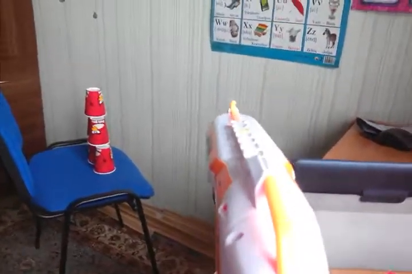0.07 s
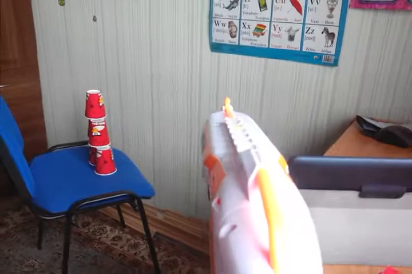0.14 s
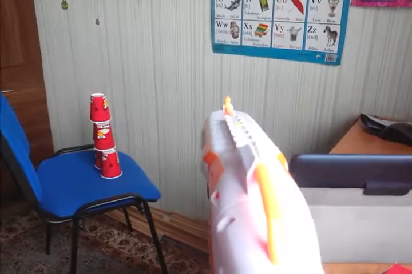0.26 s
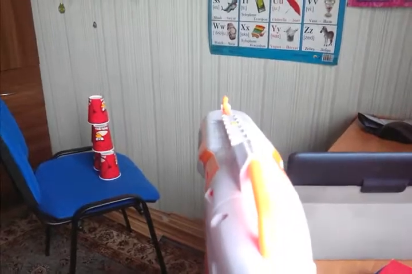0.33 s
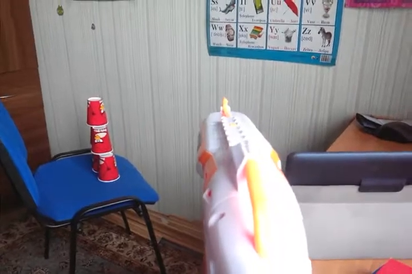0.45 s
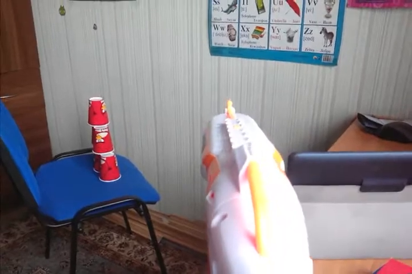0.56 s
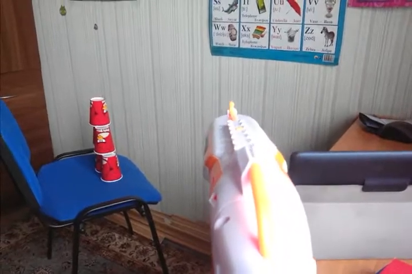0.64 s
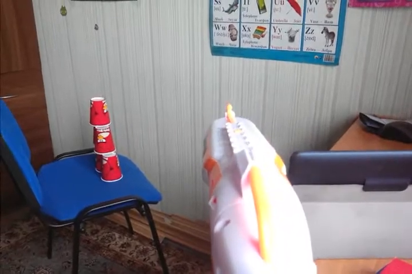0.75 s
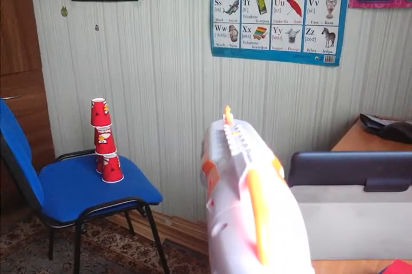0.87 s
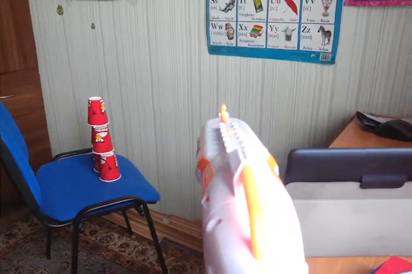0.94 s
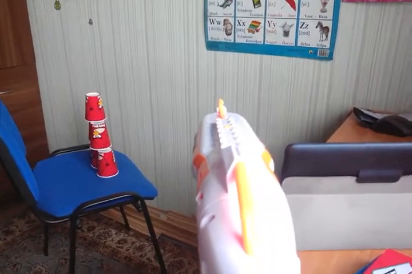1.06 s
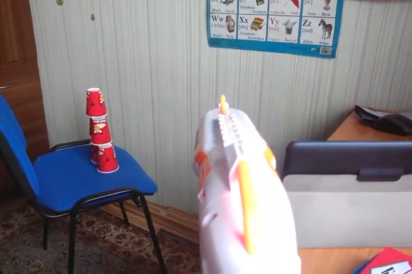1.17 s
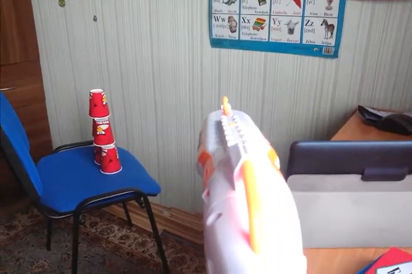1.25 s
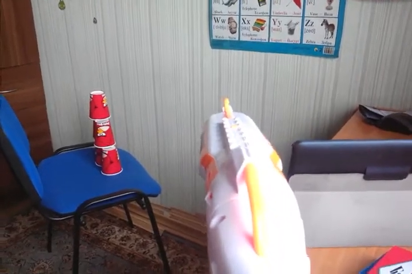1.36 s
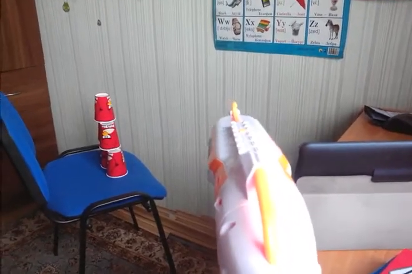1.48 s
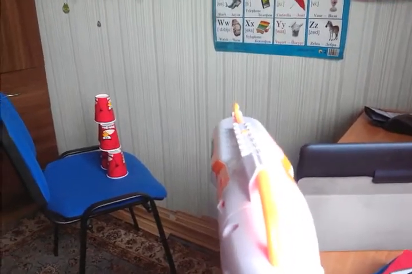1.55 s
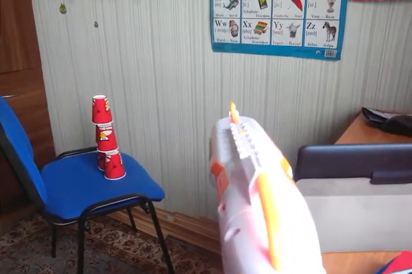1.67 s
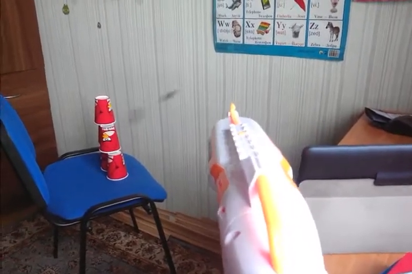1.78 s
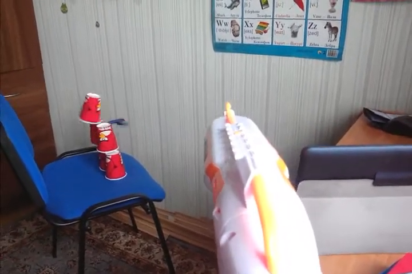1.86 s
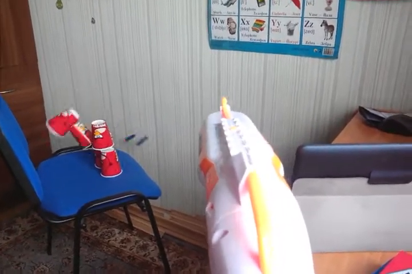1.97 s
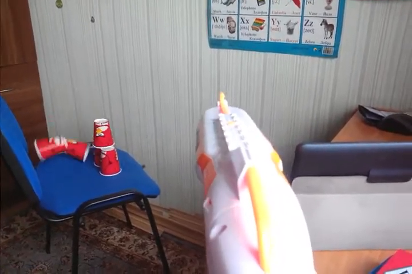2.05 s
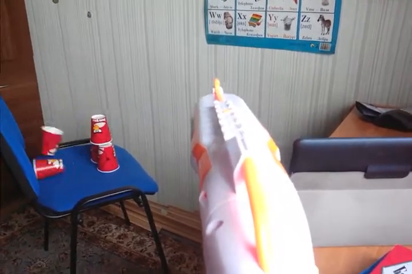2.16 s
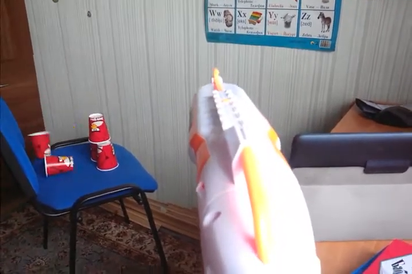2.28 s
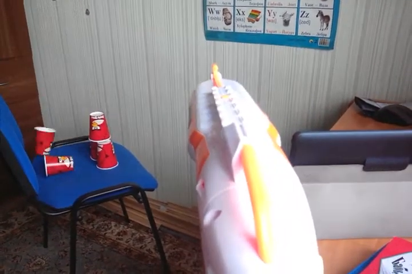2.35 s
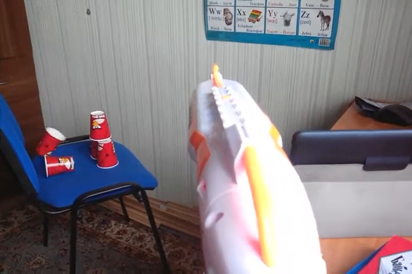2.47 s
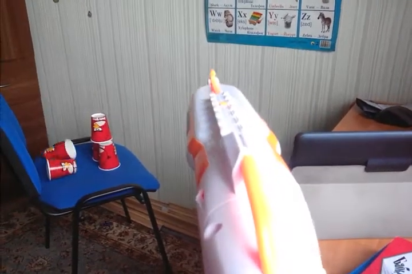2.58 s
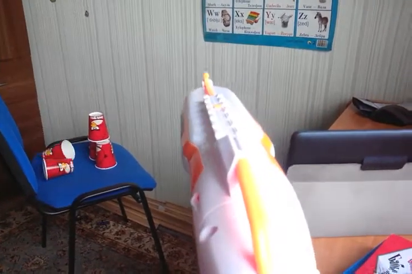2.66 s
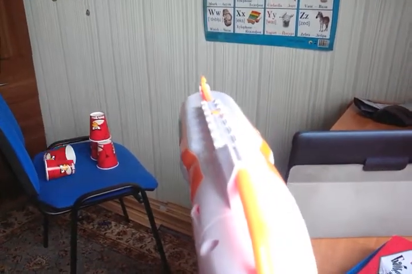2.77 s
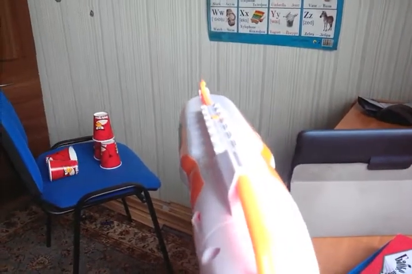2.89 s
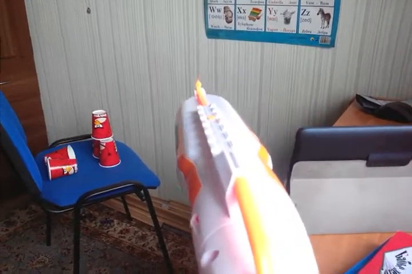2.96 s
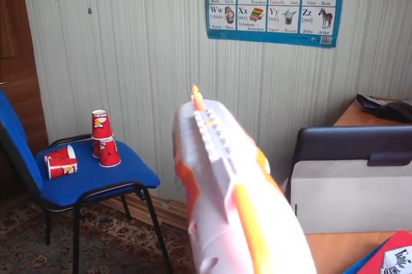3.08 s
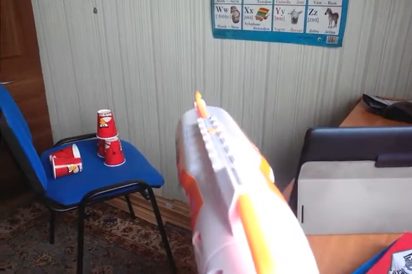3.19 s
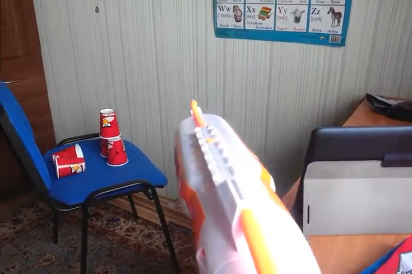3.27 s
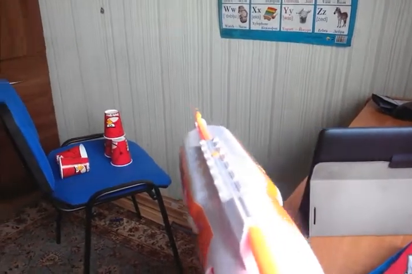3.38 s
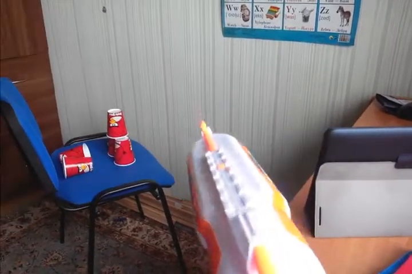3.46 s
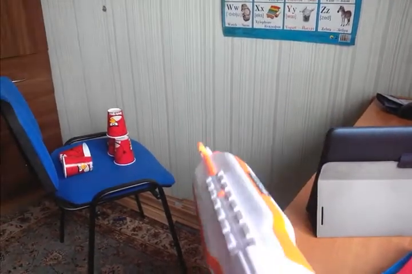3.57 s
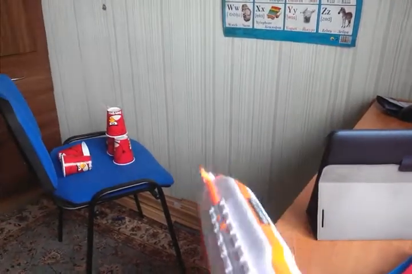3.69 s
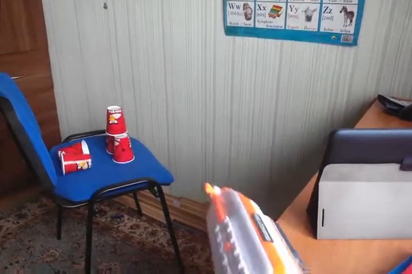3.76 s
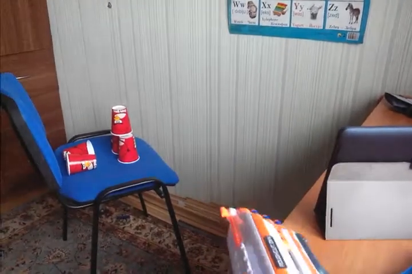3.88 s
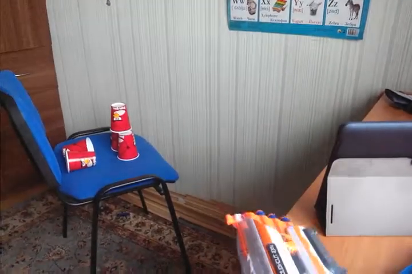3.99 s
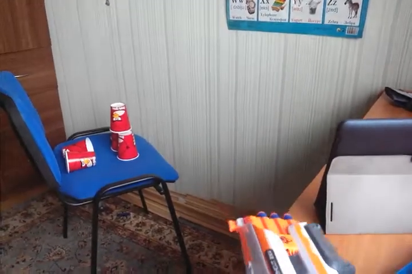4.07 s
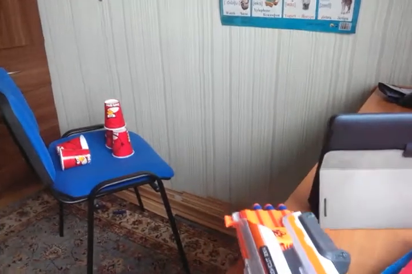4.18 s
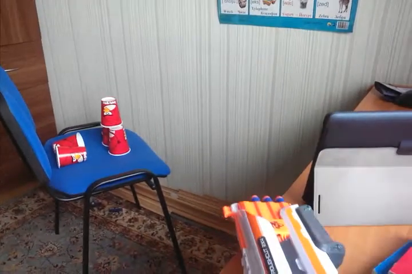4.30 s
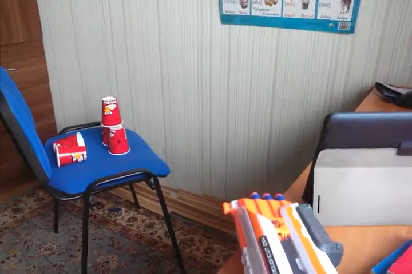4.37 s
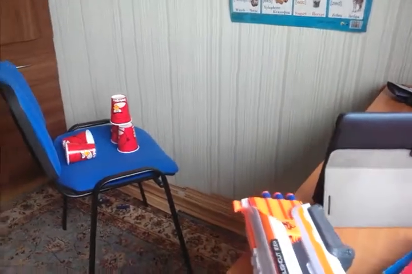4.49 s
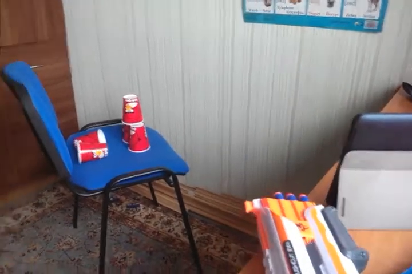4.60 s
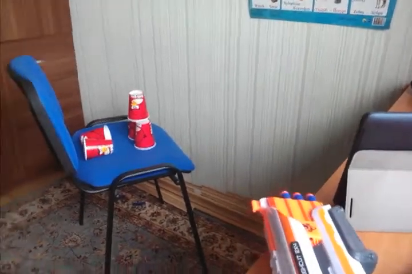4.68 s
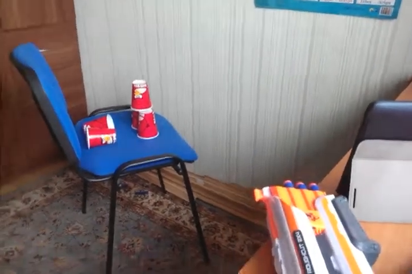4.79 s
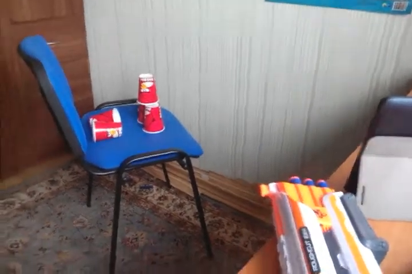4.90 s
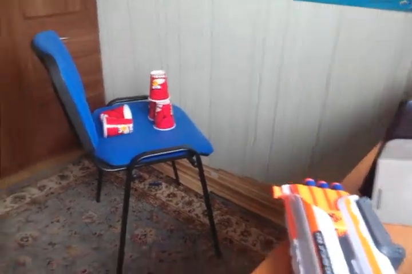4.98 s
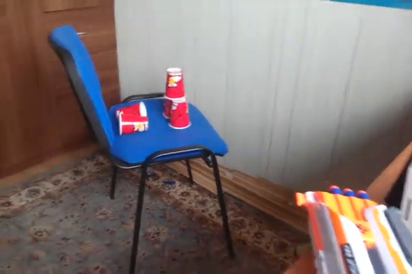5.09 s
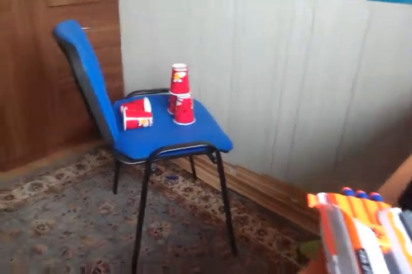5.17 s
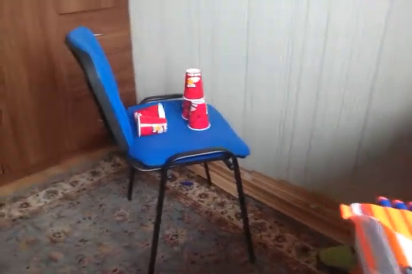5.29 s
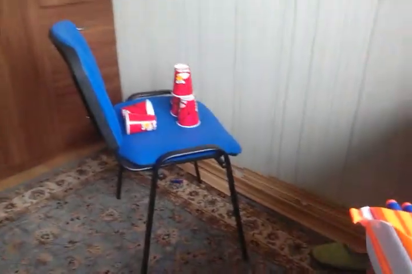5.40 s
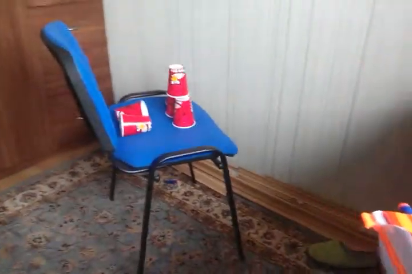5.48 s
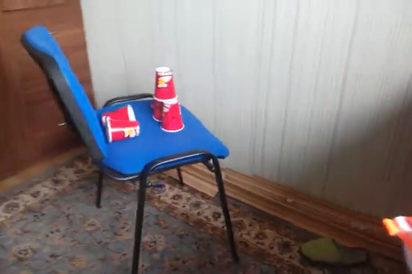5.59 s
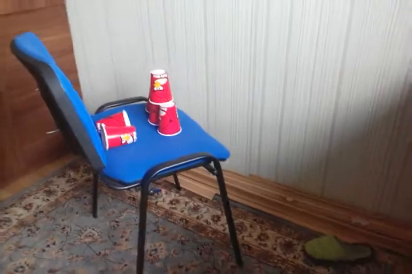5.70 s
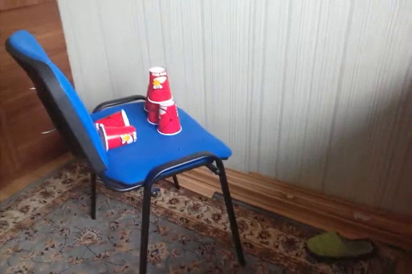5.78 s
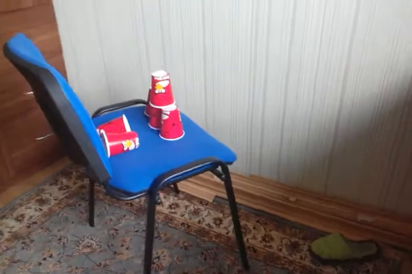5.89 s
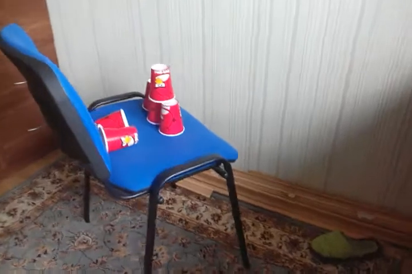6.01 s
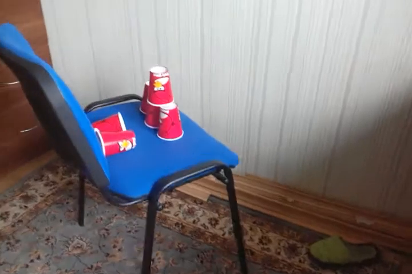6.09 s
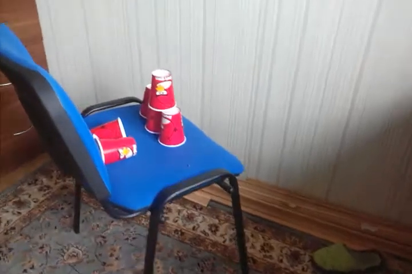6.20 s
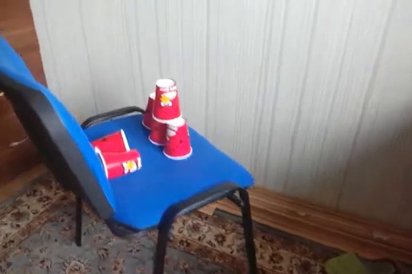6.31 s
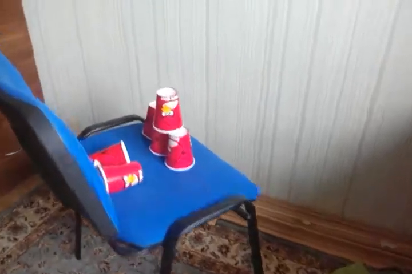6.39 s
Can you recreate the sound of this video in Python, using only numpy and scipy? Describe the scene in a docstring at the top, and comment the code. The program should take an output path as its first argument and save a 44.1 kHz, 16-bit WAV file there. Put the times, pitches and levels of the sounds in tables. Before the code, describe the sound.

Faint steady hiss for nearly two seconds, then a toy blaster fires very close: a hard, bright spring-plunger slam with plastic rattle. Foam darts tick off paper cups, which crack hollowly and drop onto a padded seat with a rim click and soft bumps. After a lull, the hollow plastic blaster knocks and clacks on a wooden desk, creaking slightly. Barely audible cloth rustle ends it. Small, lightly reverberant room, close small microphone.

```python
"""A spring toy blaster fires close by in a small room: catch, plunger slam and shell rattle, as filtered noise.
Its foam darts tick off paper cups, which crack, ring as damped modes and fall onto a padded chair.
A cup rocks against its neighbour; the blaster knocks and creaks on a wooden desk; sleeves rustle faintly.
Noise tails give the room; a soft hiss and a faint wavering whine lie under it all."""
import sys
import numpy as np
from scipy import signal
from scipy.fft import rfft, irfft, next_fast_len
from scipy.io import wavfile
from scipy.ndimage import map_coordinates

SR = 44100
rng = np.random.default_rng(int(sys.argv[2]) if len(sys.argv) > 2 else 0)


def to_wav(s):
    """Save 16-bit WAV."""
    ch = np.atleast_2d(s).T  # columns
    pcm = np.round(np.clip(ch, -1, 1) * 32767)  # PCM
    wavfile.write(sys.argv[1], SR, pcm.astype(np.int16))


N = 284291

# Trigger, catch, plunger slam, shell rattle: (time [s], level [dB], rattle t60 [s], treble tilt [dB/octave])
SHOT_EVENTS = [(1.764, -52, 0.027, -3), (1.8012, -19, 0.069, -1), (1.8117, -14.5, 0.11, 0.9),
               (1.8173, -19.5, 0.068, 3), (1.8294, -17, 0.027, -0.2), (1.8344, -22, 0.14, 1.5),
               (1.859, -27.5, 0.17, -5), (1.881, -29, 0.08, -2)]
# Darts glancing off cups and wall, then one dropping to the floor: (time [s], level [dB], resonance [Hz])
DART_TICKS = [(1.8597, -31, 4000), (1.8657, -29.5, 4100), (1.874, -31, 1180), (1.886, -29, 4200),
              (1.893, -28.5, 1180), (1.915, -35.5, 1170), (2.0947, -47, 2110), (2.0963, -44, 900)]
# Cups knocked: (time [s], wall level [dB], bottom level [dB], bottom pitch [Hz])
CUP_KNOCKS = [(1.938, -34.5, -36, 767), (1.9472, -24.5, -29.5, 763), (1.9655, -33.5, -34.5, 735),
              (1.973, -37, -25, 744), (2.015, -59, -38, 750), (2.2855, -51.5, -54, 780),
              (2.3636, -59.5, -69, 770), (2.402, -64, -58.5, 787), (2.530, -80, -64, 760),
              (2.716, -66, -67, 790), (2.802, -52.5, -59.5, 802), (2.807, -58.5, -50.5, 779)]
# A cup lands on its hard rim: (time [s], level [dB])
RIM_LANDINGS = [(2.1628, -34.5)]
# Cups land on the padded seat: (time [s], level [dB])
SEAT_LANDINGS = [(2.229, -46.5), (2.240, -42.5), (2.259, -57)]
# Blaster knocks on the desk:
# (time [s], clack level [dB], clack tilt [dB/octave], shell pitch [Hz], thud level [dB], hop [s])
DESK_KNOCKS = [(3.669, -59, 1, 1081, -83, 0.0065), (3.9949, -28.5, 2.3, 889, -46.5, 0.0045),
               (4.038, -40.5, 1, 957, -48.5, 0.002), (4.097, -54, -8, 740, -75, 0.015),
               (4.136, -44, -5.5, 753, -70, 0.013), (4.157, -48.5, 2.5, 802, -46, 0.0047),
               (4.2087, -35.5, 4, 1076, -26, 0.02), (4.283, -54.5, -7, 690, -46.5, 0.017),
               (4.357, -58, 1, 892, -74, 0.004), (4.539, -46.5, 2.5, 723, -57, 0.006),
               (4.595, -53, 0.5, 744, -52, 0.014), (4.7353, -46, 4, 1050, -69, 0.0043),
               (4.7473, -32.5, -3, 1430, -62, 0.003), (4.761, -39.5, -4.5, 1522, -46.5, 0.015),
               (4.795, -47.5, -8.5, 1650, -56, 0.012), (5.929, -57.5, -3.5, 905, -67, 0.017)]
# Blaster slides on the desk: (time [s], reference level [dB], t60 [s], hum level [dB])
DESK_SCRAPES = [(4.409, -57, 0.3, -61)]
# Dull thumps of chair, desk and floor: (time [s], level [dB], boom reference [Hz])
FURNITURE_THUMPS = [(1.955, -33.5, 406), (2.475, -70.5, 74.9), (2.70, -70, 49.95), (2.801, -74, 44),
                    (4.211, -44.5, 91), (4.804, -47.5, 90.9), (5.231, -66, 126), (5.73, -70, 118.2),
                    (5.901, -62, 129)]
# Sleeve movement: (time [s], level [dB])
SLEEVE_MOTION = [(4.85, -84), (5.0, -73.5), (5.14, -79.5), (5.22, -69), (5.6, -71), (5.71, -69), (5.9, -72),
                 (6.07, -78.5), (6.2, -74.5), (6.45, -75.5)]
# Quick slides of cloth: (middle [s], level [dB], 1/e time on each side [s])
SLEEVE_STROKES = [(4.998, -59.5, 0.032), (5.215, -62, 0.03), (5.295, -66.5, 0.015), (5.595, -63, 0.02),
                  (5.71, -64.5, 0.017), (6.44, -66.5, 0.065)]
# Hiss: (time [s], level [dB])
HISS_LEVEL = [(0, -66.3), (1.7, -66.4), (2.5, -67.3), (3.5, -67.7), (6.45, -67.7)]
# Whine before its slow level change: (mean frequency [Hz], level [dB])
WHINE_TONES = [(813, -83), (1624, -86.5), (2433, -94.5)]

# Relative spectra of blaster, paper, plastic, cushion, cloth, swish and hiss: (frequency [Hz], level [dB])
BLASTER_SPECTRUM = [(40, -40.5), (85, -33.5), (130, -11), (200, -3.5), (300, -8.5), (600, -2.5), (1300, -2),
                    (2150, 3), (3300, 1), (4300, -8), (5800, -12.5), (7500, -6.5), (11000, -17),
                    (14000, -27.5)]
PAPER_SPECTRUM = [(100, -20), (450, 0), (1000, 1), (1800, -7.5), (2500, -4), (3250, 3), (4100, -4.5),
                  (6000, -10), (9000, -13.5), (14000, -21.5)]
PLASTIC_SPECTRUM = [(60, -27), (200, -9), (700, -6.5), (1200, 3.5), (1900, -1.5), (2500, 1), (3400, -6.5),
                    (4600, -15), (7500, -19), (10000, -29), (14000, -42)]
CUSHION_SPECTRUM = [(25, -23), (55, -23), (130, 5.5), (300, 5), (600, -2.5), (1000, -5.5), (3000, -23),
                    (12000, -39)]
CLOTH_SPECTRUM = [(50, -10), (120, -8), (260, -1.5), (500, -0.5), (1000, -11), (3000, -18), (12000, -53)]
SWISH_SPECTRUM = [(200, -28.5), (1200, -3), (2200, 1), (2650, 3.5), (3300, -1), (4500, -5.5), (7000, -10.5),
                  (14000, -13)]
HISS_SPECTRUM = [(15, -61.5), (25, -27), (74, -14), (129, -3.5), (318, -3.5), (344, -4.5), (684, -7),
                 (824, -5), (1330, -9.5), (1600, -12), (1730, -11.5), (2440, -9), (2780, -12),
                 (8930, -15.5), (14000, -17)]
# A board radiates its slow motion poorly: (frequency [Hz], gain [dB])
BOARD_RADIATION = [(40, -25), (110, -16), (190, 2), (380, 6.5), (600, 9.5), (1500, 13)]

# Modes of cup bottom, wall and rim, shell and desk, before stretch: (frequency [Hz], relative level [dB], t60 [s])
BOTTOM_MODES = [(447, -17.5, 0.1), (753, 2.5, 0.051), (1109, -10.5, 0.041)]
WALL_MODES = [(3250, -1.5, 0.058), (3380, -3, 0.05)]
RIM_MODES = [(1070, 2, .03), (1220, 4.5, 0.089), (2495, 13, 0.015), (2560, 16, 0.025), (3740, 6, 0.035),
             (4000, 12, 0.013), (6970, 5.6, 0.026), (7940, 11, 0.012), (8860, 5, 0.021), (10250, -3, 0.012),
             (12400, -5, 0.012)]
SHELL_MODES = [(527, -1.5, 0.042), (919, 4.5, 0.038), (995, 0, 0.048), (1240, -6, 0.079),
               (2213, -7.5, 0.039), (3220, -19, 0.015)]
DESK_MODES = [(129.4, 1.5, 0.15), (204, 1, 0.069), (242.6, 4.5, 0.028), (320, -10.5, 0.12),
              (382, -3, 0.058), (432, -13.5, 0.089), (480, -12.5, 0.035)]
# Room decay: (frequency [Hz], t60 [s])
ROOM_T60 = [(100, 0.23), (300, 0.41), (1000, 0.4), (3000, 0.32), (7000, 0.27), (14000, 0.72)]

BLOW_SAMPLES = 16384
BLOW_TIME_S = np.arange(BLOW_SAMPLES) / SR
BLOW_HZ = np.fft.rfftfreq(BLOW_SAMPLES, 1 / SR)
TIME_S = np.arange(N) / SR
SLAM_S = SHOT_EVENTS[2][0]
ROCK_HZ = 786  # bottom pitch of the rocking cup


def blaster():
    """The catch lets go, the plunger slams home, the shell rattles; air puffs out and the room booms."""
    wet_db = -9
    puff = boom(db=-28.5, ref_hz=202, t60_s=0.1)
    puff = puff + boom(db=-45.5, ref_hz=134.6, t60_s=0.42)
    puff = puff + boom(db=-56, ref_hz=28, t60_s=0.3)
    hits = [(SLAM_S, puff, wet_db)]
    for s, db, t60_s, tilt_db in SHOT_EVENTS:
        rattle = crack(BLASTER_SPECTRUM, t60_s, tilt_db, snap=0.15)
        hits.append((s, sized(rattle, db), wet_db))
    return hits


def spring():
    """The released spring sings on faintly: one slowly decaying sine."""
    since_s = np.maximum(TIME_S - SLAM_S, 0)
    return amp(-67.5) * fade(since_s, 11.0) * np.sin(2 * np.pi * 942 * since_s)


def darts():
    """Light foam darts glance off cups and wall, then one drops to the floor: short resonant ticks."""
    wet_db, t60_periods = -2.5, 32
    return [(s, tick(db, hz, t60_periods / hz), wet_db) for s, db, hz in DART_TICKS]


def cups():
    """Paper walls crack and bottoms ring like small drums; one cup lands on its rim, one rocks to rest."""
    hits = []
    rocking = contact_series(first_s=2.832, gap_s=0.036, gap_ratio=1.2, first_db=-63, loss_db=2, count=5)
    rocks = [(s, db, db + 2.5, ROCK_HZ) for s, db in rocking]
    for s, wall_db, bottom_db, hz in CUP_KNOCKS + rocks:
        wall_crack = sized(crack(PAPER_SPECTRUM, 0.052, 0, snap=0.33), wall_db)
        wall_ring = sized(ring(WALL_MODES, hz / ROCK_HZ, attack_s=0.001), wall_db - 9.5)
        bottom = sized(ring(BOTTOM_MODES, hz / BOTTOM_MODES[1][0], attack_s=0.0043), bottom_db)
        # A cup lying by the chair back is heard mostly by way of the walls.
        wet_db = -1 if s > 2.2 else -9.5
        hits.append((s, wall_crack + wall_ring + bottom, wet_db))
    for s, db in RIM_LANDINGS:
        rim = sized(ring(RIM_MODES, 0.97, attack_s=0.00048), db)
        paper = sized(crack(PAPER_SPECTRUM, 0.34, 0.44, snap=0.39), db - 6.5)
        hits.append((s, rim + paper, -8))
    return hits


def chair():
    """The padded seat takes falls and bounces softly; its frame booms under each."""
    wet_db, hits = -3.5, []
    bounces = contact_series(first_s=2.283, gap_s=0.04, gap_ratio=1.0, first_db=-54.5, loss_db=2.5, count=6)
    for s, db in SEAT_LANDINGS + bounces:
        seat = sized(crack(CUSHION_SPECTRUM, 0.095, 0, snap=0.15), db)
        frame = boom(db - 14.5, ref_hz=49.5, t60_s=0.4)
        hits.append((s, seat + frame, wet_db))
    return hits


def desk():
    """The hollow plastic shell clacks on the desk, hops and lands again, weaker; desk modes add the thud."""
    wet_db, hits = -7, []
    hop_loss_db, hop_rattle = 4.5, 7.9  # rattle t60 in hop times
    for s, db, tilt_db, hz, thud_db, hop_s in DESK_KNOCKS:
        # A softer knock leaves the shell freer: t60 doubles per 6 dB below -30.5 dB.
        rattle_s = min(0.024 * 2 ** ((-30.5 - db) / 6), 0.17)
        # A blunt contact rings the shell more.
        shell_db = db - 2 - 0.31 * tilt_db
        stretch = hz / SHELL_MODES[1][0]  # pitch depends on which panel lands
        for delay_s, loss_db, t60_s in [(0, 0, rattle_s), (hop_s, hop_loss_db, hop_rattle * hop_s)]:
            clack = sized(crack(PLASTIC_SPECTRUM, t60_s, tilt_db, snap=0.1), db)
            shell = sized(ring(SHELL_MODES, stretch, attack_s=0.00034), shell_db)
            board = ring(DESK_MODES, 0.93, attack_s=0.0004)
            thud = sized(coloured(board, along(BOARD_RADIATION, BLOW_HZ)), thud_db)
            hits.append((s + delay_s, amp(-loss_db) * (clack + shell + thud), wet_db))
    return hits


def creak():
    """The shell slides a little on the desk, sticking and slipping ever more slowly as the hand relaxes."""
    wet_db, creak_hz = -5, 2270
    slips = contact_series(first_s=4.406, gap_s=0.0235, gap_ratio=1.38, first_db=-60, loss_db=0.3, count=4)
    hits = [(s, tick(db, creak_hz, t60_s=0.024), wet_db) for s, db in slips]
    for s, db, t60_s, hum_db in DESK_SCRAPES:
        scrape = sized(crack(PLASTIC_SPECTRUM, t60_s, tilt_db=1, snap=0.1), db + 1)
        squeak = tick(db - 4, creak_hz, t60_s)
        hum = boom(hum_db, ref_hz=170, t60_s=t60_s)
        hits.append((s, scrape + squeak + hum, wet_db))
    return hits


def thumps():
    """Heavy, soft pushes set furniture and floor booming for a moment."""
    wet_db, t60_periods = -3, 31
    return [(s, boom(db, hz, t60_periods / hz), wet_db) for s, db, hz in FURNITURE_THUMPS]


def sleeves():
    """Cloth slides in small, uneven catches, and swishes on each quick stroke."""
    motion = amp(curves(SLEEVE_MOTION)[0]) * (TIME_S > SLEEVE_MOTION[0][0])
    strokes = sum(amp(db) * np.exp(-np.abs(TIME_S - s) / side_s) for s, db, side_s in SLEEVE_STROKES)
    catches = map_coordinates(rng.standard_normal(N // 400), [TIME_S * SR / 401], order=1)
    swish_level = np.hypot(amp(-2) * motion, strokes) * amp(1.195 * catches)
    return motion * noise(CLOTH_SPECTRUM) + swish_level * noise(SWISH_SPECTRUM)


def background():
    """Even hiss, plus a faint whine of wavering pitch that sinks by 4 dB and then partly recovers."""
    hiss_db, = curves(HISS_LEVEL)
    drift = map_coordinates(rng.standard_normal(N // 4000 + 2), [TIME_S * SR / 4000])
    clock_s = np.cumsum(1 + 0.0026 * drift) / SR
    whine = sum(np.sqrt(2) * amp(db) * np.sin(2 * np.pi * hz * clock_s) for hz, db in WHINE_TONES)
    whine_db, = curves([(0, 1), (1.2, 1.5), (3.4, -2.5), (5, 0)])  # (time [s], gain [dB])
    return amp(hiss_db) * noise(HISS_SPECTRUM) + amp(whine_db) * whine


def room(hits):
    """Place (time [s], blow, room level [dB]) hits; each takes the next of eight decaying noise tails."""
    hz, t_s, bins = signal.stft(rng.standard_normal((8, 2 * BLOW_SAMPLES)), SR, nperseg=256)
    decay = fade(t_s, along(ROOM_T60, hz)[:, None])
    tails = signal.istft(bins * decay, SR, nperseg=256)[1][:, :2 * BLOW_SAMPLES]
    tail_s = np.arange(2 * BLOW_SAMPLES) / SR
    tails *= 1 - np.exp(-tail_s / 0.001)  # first reflections come from near by
    tails *= 1 + amp(4.5) * fade(tail_s, 0.48)  # close walls and furniture answer loudest
    answers = rfft(tails)
    out = np.zeros(N + 2 * BLOW_SAMPLES)
    for k, (s, blow, wet_db) in enumerate(hits):
        echo = irfft(rfft(blow, 2 * BLOW_SAMPLES) * answers[k % len(answers)])
        echo_gain = amp(wet_db) * np.sqrt(np.sum(blow ** 2) / np.sum(echo ** 2))
        start = round(s * SR)
        out[start:start + BLOW_SAMPLES] += blow
        out[start:start + 2 * BLOW_SAMPLES] += echo * echo_gain
    return out[:N]


def contact_series(first_s, gap_s, gap_ratio, first_db, loss_db, count):
    """(time [s], level [dB]) of ever weaker contacts, each gap gap_ratio times the last."""
    k = np.arange(count)
    times_s = first_s + np.r_[0, np.cumsum(gap_s * gap_ratio ** k[:-1])]
    return list(zip(times_s, first_db - loss_db * k))


def tick(db, hz, t60_s):
    """A light, dry contact with one broad resonance."""
    hump = [(hz / 12, -32), (hz / 1.4, -13), (hz, 0), (hz * 1.3, -13), (hz * 3, -25), (hz * 8, -45)]
    return sized(crack(hump, t60_s, 0, snap=0.2), db)


def boom(db, ref_hz, t60_s):
    """A heavy, soft push that sets something large booming, strongest just under an octave above ref_hz."""
    # (offset from ref_hz [octaves], level [dB]); point order matters to the interpolation
    points = [(-0.5, -42.5), (-1.22, -20), (1.0, 2.0), (0.24, -9), (2.0, -31.5), (2, -68.5)]
    spectrum = [(ref_hz * 2 ** octave, level_db) for octave, level_db in points]
    return sized(crack(spectrum, t60_s, 0, snap=0.5), db)


def crack(spectrum, t60_s, tilt_db, snap):
    """One sharp contact (snap) followed by a dense, dying rattle of the struck body."""
    rattle = rng.standard_normal(BLOW_SAMPLES) * fade(BLOW_TIME_S, t60_s)
    rattle /= np.linalg.norm(rattle)
    rattle[0] = snap
    octaves = np.log2(np.maximum(BLOW_HZ, 500) / 2000)
    return coloured(rattle, along(spectrum, BLOW_HZ) + tilt_db * octaves)


def ring(modes, stretch, attack_s):
    """Damped modes, frequencies times stretch, at slightly new strengths for every blow."""
    hz, db, t60_s = np.transpose(modes)[:, :, None]
    sign = (-1) ** np.arange(len(hz))[:, None]
    strength = sign * amp(db + rng.normal(0, 1, hz.shape))
    waves = strength * fade(BLOW_TIME_S, t60_s) * np.sin(2 * np.pi * hz * stretch * BLOW_TIME_S)
    return waves.sum(0) * (1 - np.exp(-BLOW_TIME_S / attack_s))


def coloured(x, gain_db):
    """Minimum-phase filter by folded cepstrum, so that nothing sounds before the blow."""
    cepstrum = irfft(np.log(amp(gain_db)))
    half = BLOW_SAMPLES // 2
    fold = np.r_[1, np.full(half - 1, 2), np.zeros(half)]
    return irfft(rfft(x) * np.exp(rfft(cepstrum * fold)))


def noise(spectrum):
    """Steady coloured noise of rms 1."""
    size = next_fast_len(N)
    gain = amp(along(spectrum, np.fft.rfftfreq(size, 1 / SR)))
    x = irfft(rfft(rng.standard_normal(size)) * gain, size)[:N]
    return x / np.std(x)


def sized(x, db):
    """Scale a blow to the energy of 10 ms at rms level db."""
    return x * amp(db) * np.sqrt(SR / 100 / np.sum(x ** 2))


def amp(db):
    """Decibels to gain."""
    return 10 ** (np.asarray(db) / 20)


def fade(t_s, t60_s):
    """Exponential decay of 60 dB in t60_s, 1 ms at least."""
    return np.exp(-np.log(1000) * t_s / np.maximum(t60_s, 1e-3))


def along(points, hz):
    """(frequency [Hz], value) points read on a log frequency axis."""
    f, v = np.transpose(points)
    return np.interp(np.log(hz + 1), np.log(f + 1), v)


def curves(rows):
    """One value per sample for each column after the time [s]."""
    s, *cols = np.transpose(rows)
    return [np.interp(TIME_S, s, c) for c in cols]


def scene():
    """All sources at one microphone; only the blows get room tails."""
    blows = room(blaster() + darts() + cups() + chair() + desk() + creak() + thumps())
    return (blows + spring() + sleeves() + background())[None]


def record(dry):
    """The small microphone loses the deepest bass; nothing is kept above the band limit."""
    size = next_fast_len(N + BLOW_SAMPLES)
    lean = signal.sosfilt(signal.butter(2, 42, "high", fs=SR, output="sos"), dry)
    # 200 Hz wide edge at 14 kHz
    edge = np.clip((14000 - np.fft.rfftfreq(size, 1 / SR)) / 200 + 0.5, 0, 1)
    return irfft(rfft(lean, size) * edge, size)[:, :N]


dry = scene()
out = record(dry)
to_wav(out)
```